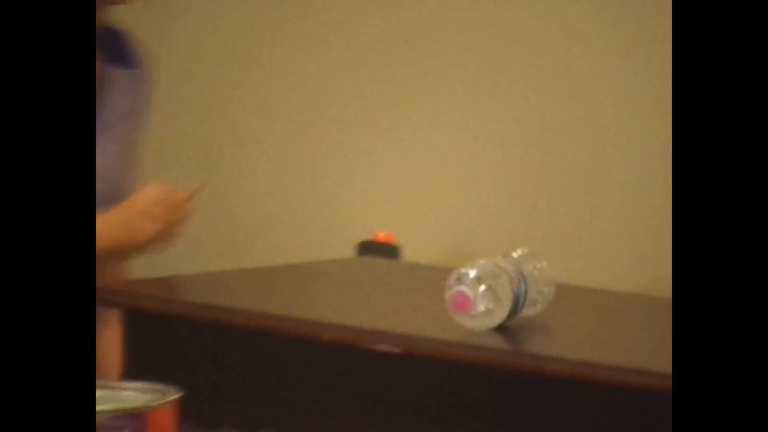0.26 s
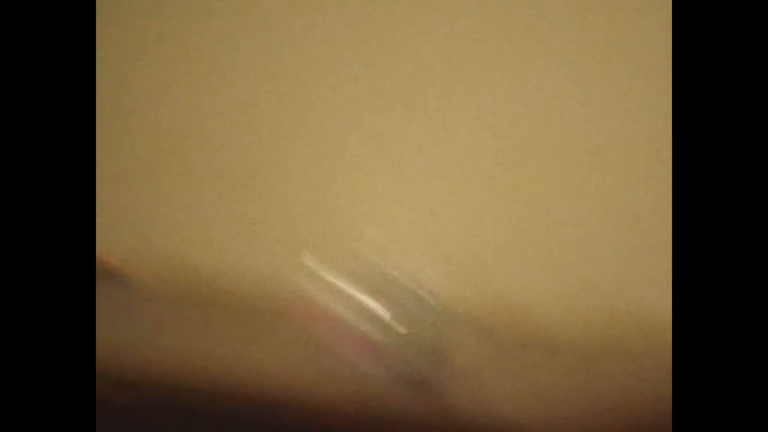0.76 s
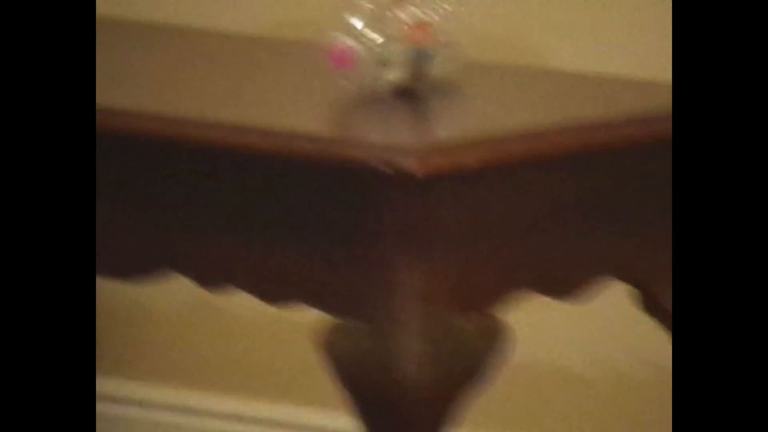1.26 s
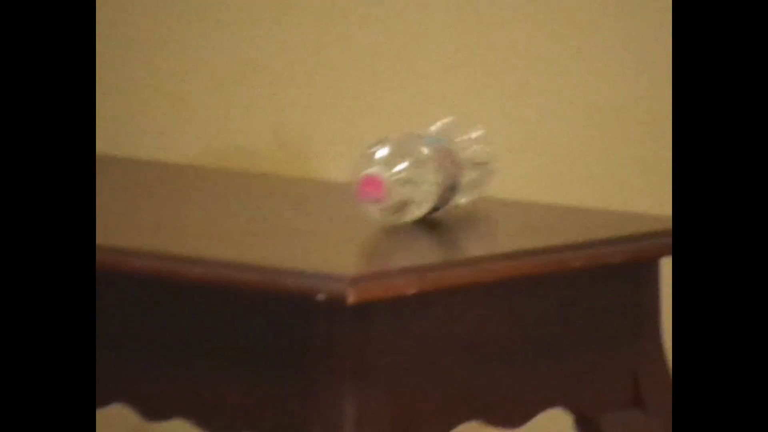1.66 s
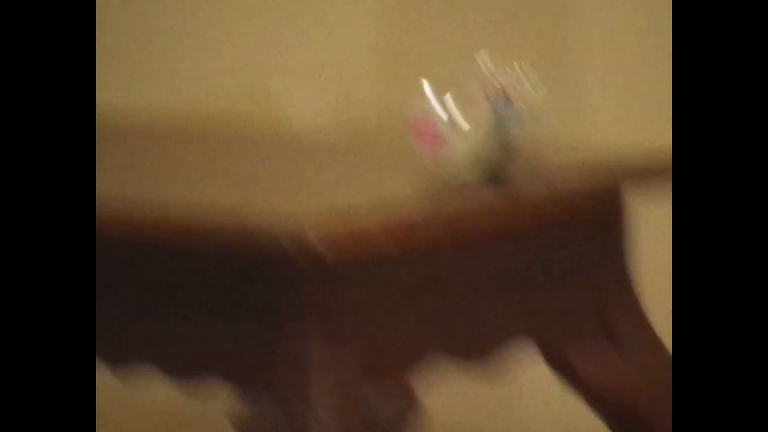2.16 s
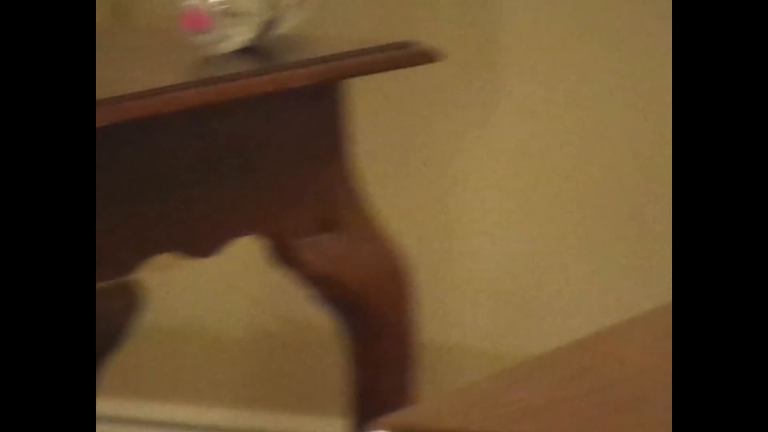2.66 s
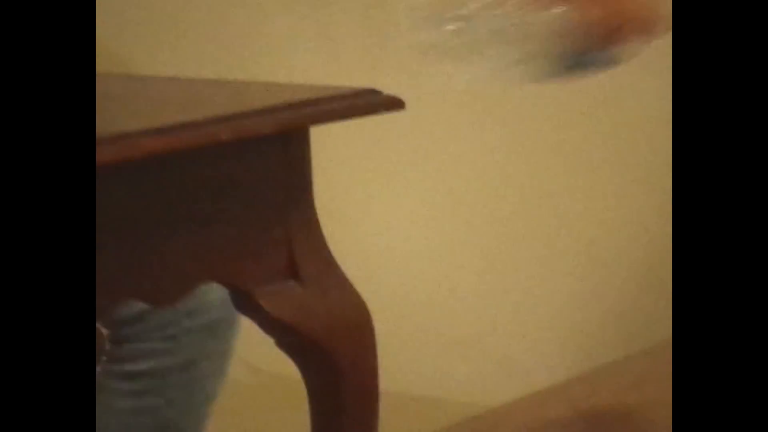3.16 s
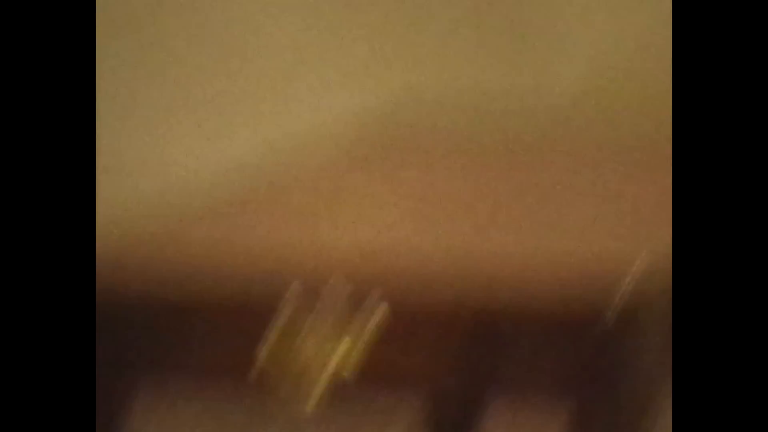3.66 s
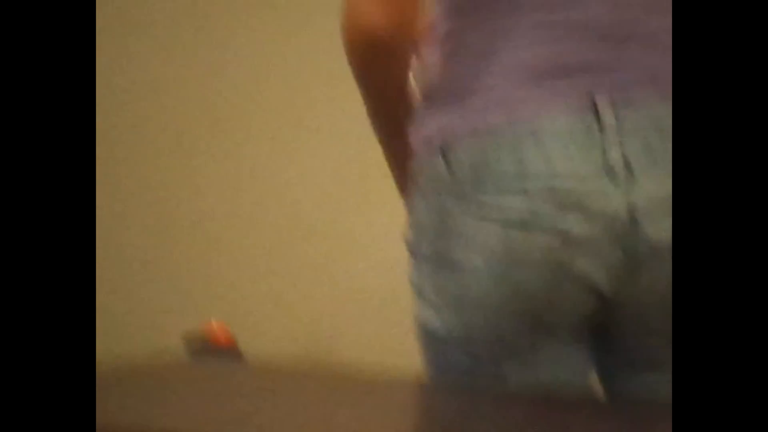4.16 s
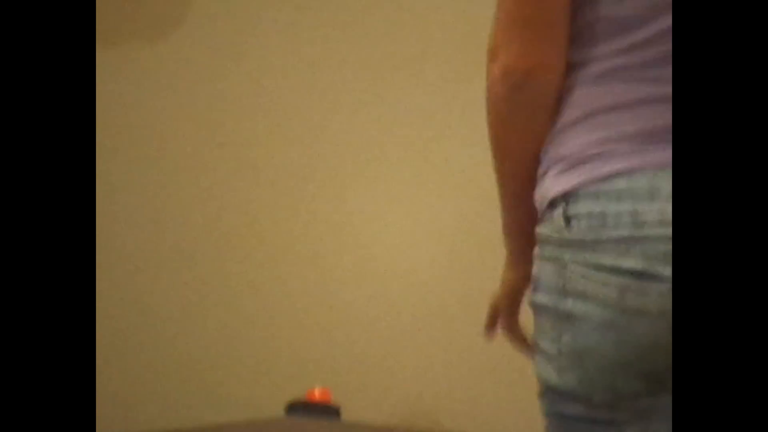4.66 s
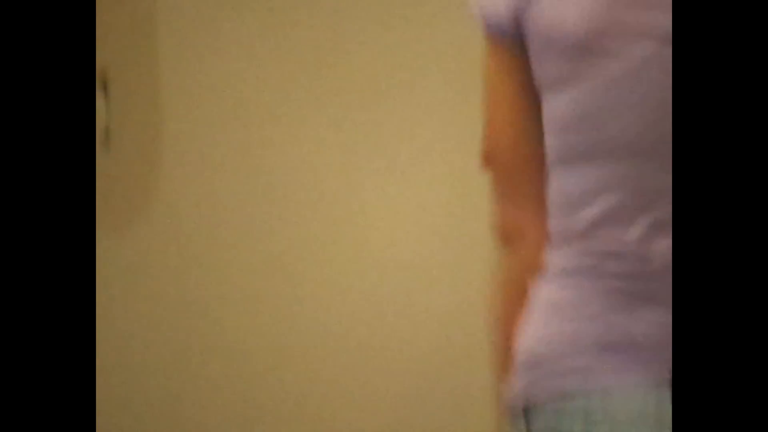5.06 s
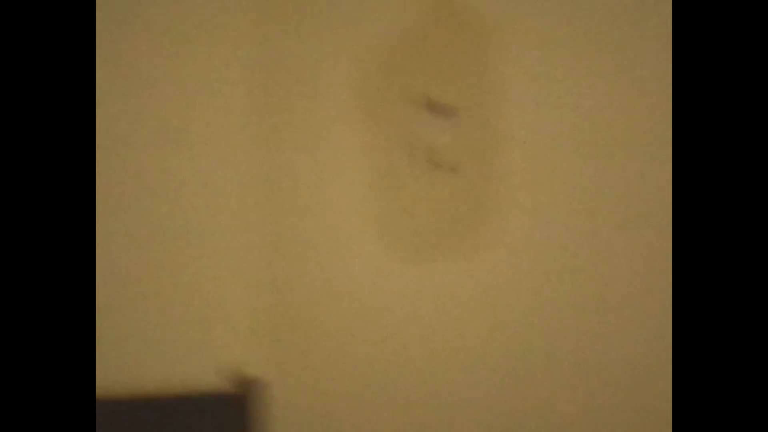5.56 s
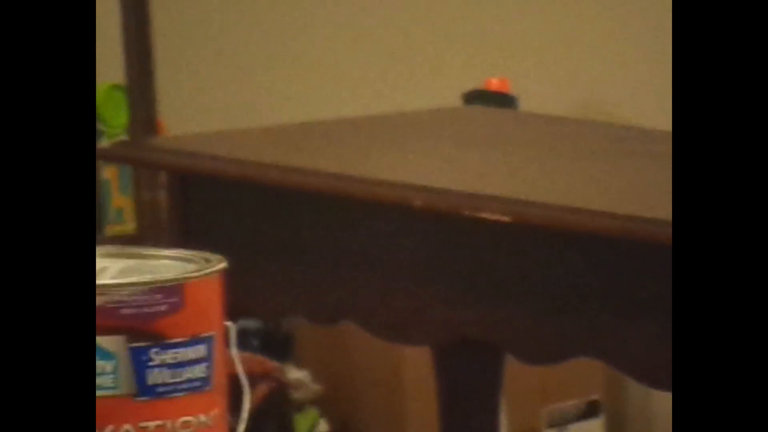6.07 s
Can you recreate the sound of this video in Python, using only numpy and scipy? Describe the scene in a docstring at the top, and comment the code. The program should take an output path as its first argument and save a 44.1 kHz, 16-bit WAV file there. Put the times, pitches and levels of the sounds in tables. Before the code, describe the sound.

A small, bare room with a faint steady motor whir, drifting air hiss, low rumble and a very thin whistle. At 0 s the tail of a strong plastic bottle landing on a wooden table is heard, then crackly hollow bounces at about 0.07, 0.11 and 0.27 s, and duller woody rocking near 0.5 s. Faint ticks follow until 0.95 s. After a quiet gap, light taps come at 1.7 and 2.0 s, with a small knock cluster around 2.2 s. Firmer plastic knocks strike at 3.15-3.22 s, trailing into weaker ones and a soft swell of hiss by 3.5 s, with a tiny tick at 3.8 s. A dry, close handling knock comes at 4.04 s. Near-quiet lasts until 5.4 s, when the hardest landing cracks out, very loud and distorted, with a brief dense echo and low table ring. Soft dull knocks come around 5.95 s, then background to about 6.3 s.

```python
"""A partly filled plastic bottle lands, bounces and rocks on a wooden table; the hardest landing clips.
Random clicks drive each contact's knock, bottle ring, table thump and crackle; at 4.043 s comes
a dry handling knock close to the microphone. A lingering table ring near 290 Hz is slow to build, and
a small bare room adds dense echoes. Under it a small motor whirs steadily, with drifting air hiss,
a low rumble, a mid hiss and a thin whistle, all shaped noise; a faint antiphase hiss parts the channels."""
import sys
import numpy as np
from scipy import signal
from scipy.fft import rfft, irfft
from scipy.io import wavfile
from scipy.ndimage import uniform_filter1d

SR = 44100
rng = np.random.default_rng(int(sys.argv[2]) if len(sys.argv) > 2 else 0)


def dump_mix(stems):
    """Bounce the given channels to the path in sys.argv[1] as a 16-bit WAV at rate SR."""
    frames = np.atleast_2d(stems).T  # one column per channel
    limited = np.clip(frames, -1, 1)  # hard clip at full scale
    pcm = np.round(limited * 32767).astype(np.int16)
    wavfile.write(sys.argv[1], SR, pcm)


N = 278305


def undb(db):
    """Amplitude ratio of a level in dB."""
    return 10 ** (np.asarray(db) / 20)


def level(x, db):
    """Scale x to an RMS level in dB re full scale."""
    return x * undb(db) / np.sqrt(np.mean(x ** 2))


def noise(size=N):
    """White Gaussian noise."""
    return rng.standard_normal(size)


def band(x, hz, width_hz):
    """Two-pole band-pass, gain 1 at the centre."""
    return signal.lfilter(*signal.iirpeak(hz, hz / width_hz, fs=SR), x)


def band_twice(x, hz, width_hz):
    """The same band-pass in series with itself, for steeper skirts."""
    return band(band(x, hz, width_hz), hz, width_hz)


def colour(x, points):
    """Shape the spectrum of x by (f/Hz, gain/dB) points, straight lines over log frequency."""
    hz, db = np.transpose(points)
    f_hz = np.maximum(np.arange(len(x) // 2 + 1) * SR / len(x), 1)
    gain_db = np.interp(np.log(f_hz), np.log(hz), db, left=-80)
    return irfft(rfft(x) * undb(gain_db), len(x))


def walk(rate_hz, size):
    """Random levels held 1 / rate_hz, then smoothed by two moving averages; spread near 1."""
    hold = int(SR / rate_hz)
    steps = np.repeat(noise(size // hold + 1), hold)
    return 1.36 * uniform_filter1d(uniform_filter1d(steps, hold), hold)[:size]


def click_force(shape):
    """Random clicks under a force envelope, whitened to push all frequencies nearly alike."""
    force = noise(len(shape)) * undb(2.0 * rng.exponential(size=len(shape))) * shape
    for _ in range(4):
        spectrum = rfft(force)
        white = irfft(spectrum / (np.abs(spectrum) + 1e-12), len(shape))
        force = white * shape ** 0.072
    return force * np.sqrt(np.sum(shape ** 2) / np.sum(force ** 2))


def knock(force, hz):
    """The knock's own resonance, broad and short; low knocks are narrower, so more pitched."""
    width_share, widening, widest_hz = 0.7, 0.63, 760
    width_hz = min(width_share * hz * (hz / 1000) ** widening, widest_hz)
    return band_twice(force, hz, width_hz) * np.sqrt(SR / 2 / width_hz)


def ring(force, modes, stretch):
    """Parallel decaying resonances driven by the force, each frequency scaled by its stretch."""
    out = 0
    for (hz, db, t60_s), factor in zip(modes, stretch):
        width_hz = np.log(1000) / (np.pi * t60_s)
        out = out + undb(db) * np.sqrt(SR / 2 / width_hz) * band(force, hz * factor, width_hz)
    return out


def bottle_ring(force, crackle_db):
    """Bottle modes, shifted at random as the water's place varies; dull knocks ring them less."""
    # bottle modes: f/Hz, level/dB, t60/s
    modes = [(770, -1.5, 0.0074), (864, -1.5, 0.035), (1278, -13, 0.054), (1420, -7, 0.056),
             (1710, -14, 0.07), (2250, -13.5, 0.0037), (3360, -17.5, 0.02)]
    bottle_db, db_per_crackle_db, detune = -7, 0.13, 0.022
    stretch = 1 + detune * noise(len(modes))
    return undb(bottle_db + db_per_crackle_db * min(crackle_db, 0)) * ring(force, modes, stretch)


def table_thump(force):
    """Fixed low modes of the table top."""
    # table-top modes: f/Hz, level/dB, t60/s
    modes = [(115, -14, 0.17), (209, -9.5, 0.044), (271.3, -4.5, 0.046), (350.4, -5.5, 0.036),
             (522, -7, 0.012)]
    return ring(force, modes, np.ones(len(modes)))


def wall_crackle(force):
    """Broadband crumpling of the thin wall: the coloured force at its own energy."""
    # crackle spectrum: f/Hz, relative level per Hz/dB
    spectrum = [(600, -11), (1500, 3), (3000, 2), (4500, -0.5), (6000, -9), (9000, -7.5), (12000, -3),
                (16000, -16)]
    crackle = colour(force, spectrum)
    return crackle * np.sqrt(np.sum(force ** 2) / np.sum(crackle ** 2))


def room_echoes(sound):
    """Dense echoes that build over a few ms, shortest in the top treble."""
    # echo bands: f/Hz, t60/s, relative level/dB
    bands = [(125, 0.36, -3), (267, 0.37, 3.5), (443, 0.48, 9.5), (930, 0.44, 1), (1920, 0.4, 3),
             (3840, 0.37, 1), (7860, 0.33, 5), (13700, 0.087, 11.5)]
    echo_db, build_ms = 1.5, 1.43
    t = np.arange(SR // 2 + SR // 4) / SR
    tail = 0
    for hz, t60_s, db in bands:
        tail = tail + undb(db - 60 * t / t60_s) * band_twice(noise(len(t)), hz, hz)
    tail = tail * (1 - np.exp(-1000 * t / build_ms))
    tail = undb(echo_db) * tail / np.sqrt(np.sum(tail ** 2))
    return signal.fftconvolve(sound, tail)[:len(sound)]


def lingering_table_ring(push):
    """A decaying sine, slow to build, driven by the push on the table."""
    hz, db, t60_s, build_ms = 290, 0.82, 0.53, 65
    t = np.arange(SR // 2 + SR // 4) / SR
    envelope = undb(-60 * t / t60_s) * (1 - np.exp(-1000 * t / build_ms))
    response = envelope * np.sin(2 * np.pi * hz * t)
    response = undb(db) * response / np.sqrt(np.sum(response ** 2))
    return signal.fftconvolve(push, response)[:len(push)]


def contacts_and_handling_knock():
    """Brief forces that swell and die within ms, each sent through the same resonances and the room."""
    # bottle contacts, and at 4.043 s a dry handling knock close to the microphone:
    # t/s at full force, level/dB, rise/ms, fall/ms, knock f/Hz,
    # crackle/dB, table/dB, room send/dB (last three relative to the row's level)
    hits = [(-.05, -19, 26, 4.4, 1060, 1, -11, 5.5), (.066, -32, 9.6, 14, 3130, -1, -11, 2.5),
            (.110, -35, 3, 8.7, 980, 13, -6, -15), (.121, -32.5, 6.4, 7.7, 980, 4, -4, 7),
            (.265, -43, 11, 10.4, 1300, -8, -6, 6.5), (.351, -54, 10, 5.1, 1590, 8, 8.5, -5.5),
            (.474, -40.5, 25, 57, 276, -9, 3, -17), (.487, -34.5, 11.3, 6.2, 795, -1.5, 5.5, -2.5),
            (0.526, -42, 26, 25, 290, -24, 1.5, -29), (.763, -46, 5.4, 6.9, 2480, 4.5, -25, 0),
            (0.804, -49, 5.6, 3.9, 2060, 0, -2, -2), (0.952, -52, 6.5, 3.9, 1450, -2, -5, 4.5),
            (1.682, -51.5, 4.6, 10, 3040, 5.5, 1, -7), (1.709, -49, 6.3, 12, 1300, -22, -9, -1),
            (1.993, -46, 35, 15, 2420, 4, -10, -2.5), (2.187, -49.5, 4.5, 4.6, 2460, 4, -6, 6),
            (2.203, -42, 3.5, 5.2, 1280, 2.5, -11, -0.5), (2.246, -44.5, 6.4, 8, 1300, -1, -11, -4),
            (3.148, -28, 13, 12, 1210, -1, -13, 2), (3.188, -28.5, 11.3, 13, 1510, 2.5, -31, -6.5),
            (3.218, -40.5, 7.4, 6.2, 1620, 4.5, -25, 2), (3.365, -43.5, 5, 18, 2120, -10, -22, -0.5),
            (3.476, -46.5, 5.1, 18, 1370, -4.5, -10, -3), (3.802, -52, 4, 3.9, 2160, -10, -16, 4),
            (4.043, -30, 3.5, 3.5, 660, -20.5, -9.5, -10), (5.404, -19, 3.5, 15.7, 1600, 1.5, -9.5, -4),
            (5.414, -7.5, 8.2, 5.8, 1140, -2, -10, -2), (5.935, -44, 16, 34.6, 1020, 2, -1, -3.5),
            (5.943, -37.5, 11.4, 12.3, 343, -7, -4.5, -10), (5.969, -41, 9.3, 8.3, 1500, -19, -22, -6),
            (6.006, -49, 15, 13, 326, -20, -9, -23)]
    lead = int(.2 * SR)  # space for a contact before time 0
    crisp_top_hz, crackle_db_per_octave = 6630, 16.5  # treble reach at 0 dB crackle, and its slope
    size = SR // 4
    t = np.arange(size) / SR - .05
    near, far, push = np.zeros((3, N + lead + size))
    for s, db, rise_ms, fall_ms, knock_hz, crackle_db, table_db, room_db in hits:
        swell = np.clip(1 + 1000 * t / rise_ms, 0, 1) ** 1.38
        fall = np.exp(-1000 * np.abs(t) / fall_ms)
        force = click_force(np.where(t < 0, swell, fall))
        sound = knock(force, knock_hz) + bottle_ring(force, crackle_db)
        sound = sound + undb(table_db) * table_thump(force)
        sound = sound + undb(crackle_db) * wall_crackle(force)
        # less crackle: less treble
        top_hz = crisp_top_hz * 2 ** (crackle_db / crackle_db_per_octave)
        sound = signal.lfilter(*signal.butter(3, top_hz, fs=SR), undb(db) * sound)
        at = lead + int((s + t[0]) * SR)
        near[at:at + size] += sound
        far[at:at + size] += undb(room_db) * sound
        push[at:at + size] += undb(db + table_db) * force
    heard = (near + room_echoes(far) + lingering_table_ring(push))[lead:lead + N]
    # cut the deep bass below 150 Hz
    return signal.sosfilt(signal.butter(3, 150, "high", fs=SR, output="sos"), heard)


def air_hiss():
    """Broad coloured noise in half-octave steps, each band's level drifting by itself."""
    # hiss spectrum: f/Hz, relative level per Hz/dB
    spectrum = [(15, -62), (25, -43), (48, -23), (322, -6), (368, -8.5), (684, -3), (741, -2), (895, -4.5),
                (970, -6), (1300, -10), (1450, -11), (1620, -11.5), (4620, -28), (14300, -26.5),
                (15500, -25)]
    drift_db, drift_hz = 1.55, 4.55
    hiss = 0
    for hz in 30 * 2 ** np.arange(0, 9.1, .5):
        hiss = hiss + undb(drift_db * walk(drift_hz, N)) * band(noise(), hz, hz / 3)
    return level(colour(hiss, spectrum), -49.5)


def motor_whir():
    """Steady motor tones, each a narrow noise band that wavers."""
    # motor tones: f/Hz, width/Hz, RMS level/dB
    tones = [(215, 21, -66), (559, 10.5, -63.5), (630, 2.1, -71.5), (703.7, 2.4, -60.5), (880, 34, -75.5),
             (919.6, 12, -54), (1132, 0.83, -63), (1264, 2.4, -60.5), (1615, 26, -62.5)]
    return sum(level(band(noise(), hz, width_hz), db) for hz, width_hz, db in tones)


def low_rumble():
    """Noise around 65 Hz under a slow level curve."""
    # rumble level: t/s, level/dB
    curve = [(0, -63.5), (1.0, -65.5), (1.3, -64.5), (2.3, -62), (2.65, -67), (4.0, -67), (5.1, -73),
             (5.5, -60.5), (6.3, -68)]
    t = np.arange(N) / SR
    return level(band_twice(noise(), 65, 39), 0) * undb(np.interp(t, *np.transpose(curve)))


def mid_hiss():
    """Soft, slightly fluttering noise around 1.4 kHz that comes and goes."""
    # mid hiss level: t/s, level/dB
    curve = [(.55, -58), (.9, -54), (1.4, -65.5), (2.13, -55.5), (2.42, -60), (2.7, -66.5), (3.16, -58),
             (3.34, -47.5), (3.55, -62), (4.2, -54.5), (4.55, -66.5), (4.87, -56), (5.3, -71), (5.56, -61),
             (5.67, -65.5), (6.3, -54.5)]
    flutter_db, flutter_hz = 0.6, 30
    t = np.arange(N) / SR
    grains = noise() * undb(flutter_db * walk(flutter_hz, N))
    return level(band_twice(grains, 1440, 3000), 0) * undb(np.interp(t, *np.transpose(curve)))


def thin_whistle():
    """A faint noise band at 5.3 kHz with a drifting level."""
    drift_db, drift_hz = 1, 2.48
    return level(band(noise(), 5290, 330), -72) * undb(drift_db * walk(drift_hz, N))


def scene():
    """Bottle and handling sounds over the background, the same on both channels."""
    background = air_hiss() + motor_whir() + low_rumble() + mid_hiss() + thin_whistle()
    mono = contacts_and_handling_knock() + background
    return np.array([mono, mono])


def record(dry):
    """The converter clips at 0.95, adds a hiss of opposite sign per channel and cuts the top."""
    side_hiss_db, top_hz = -80, 15000
    side = level(noise(), side_hiss_db) * np.array([[1], [-1]])
    top = signal.ellip(14, .3, 70, top_hz, fs=SR, output="sos")
    return signal.sosfilt(top, np.clip(dry, -.95, .95) + side)


dry = scene()
out = record(dry)
dump_mix(out)
```